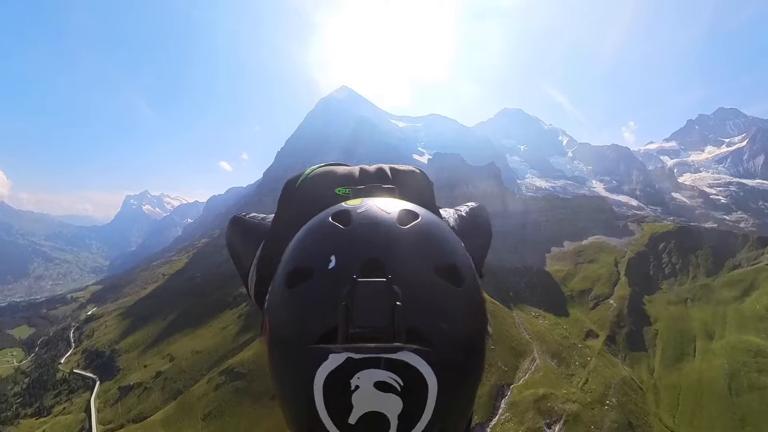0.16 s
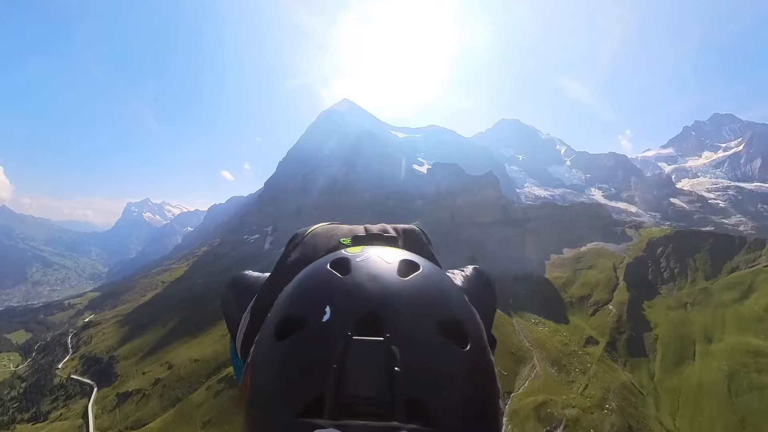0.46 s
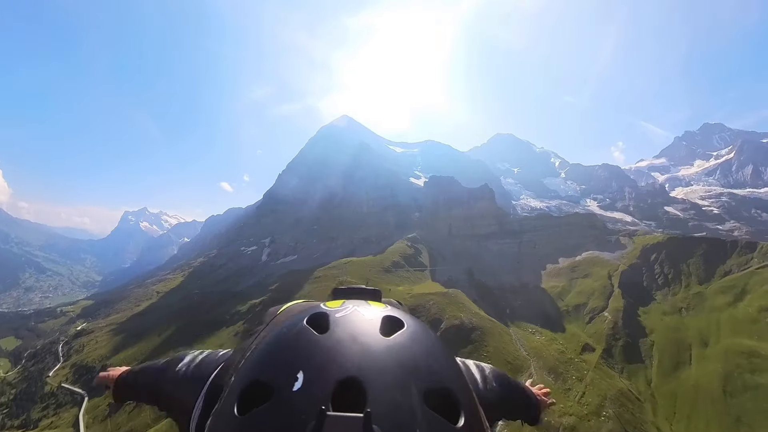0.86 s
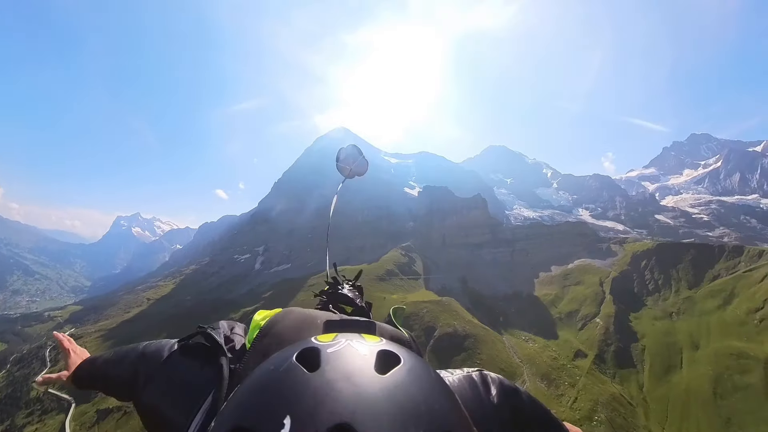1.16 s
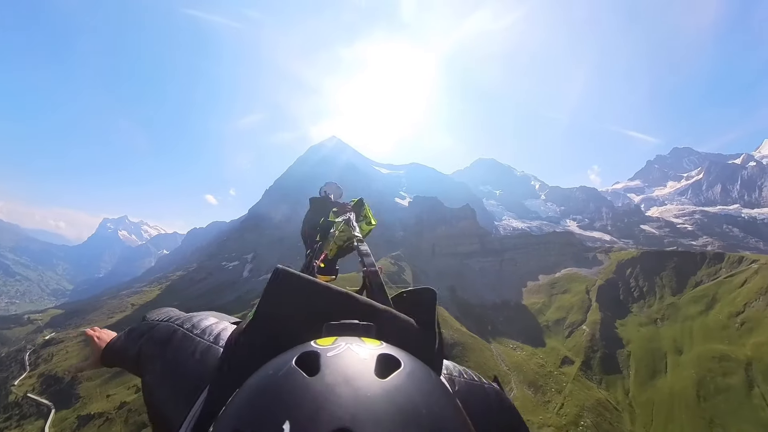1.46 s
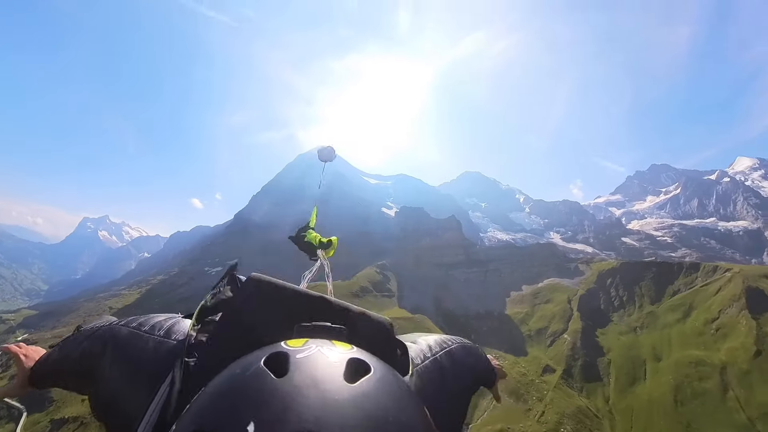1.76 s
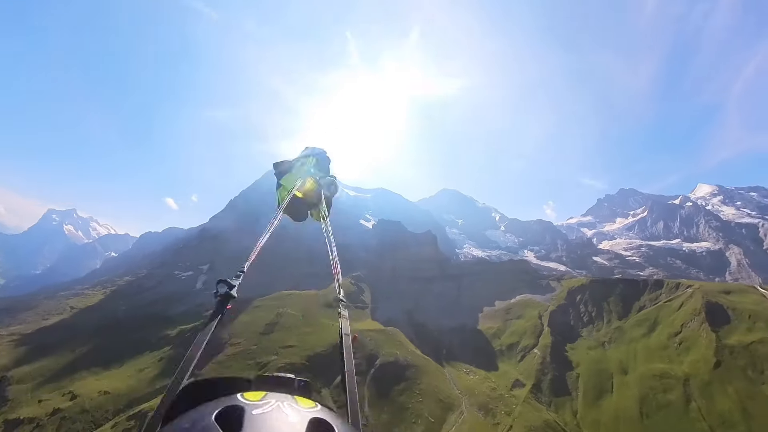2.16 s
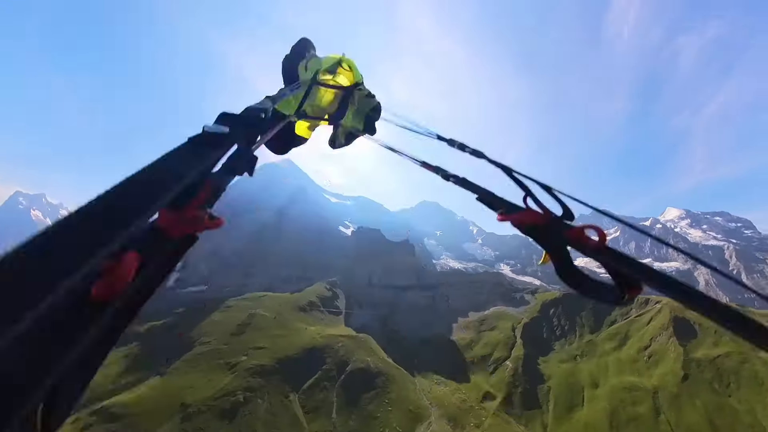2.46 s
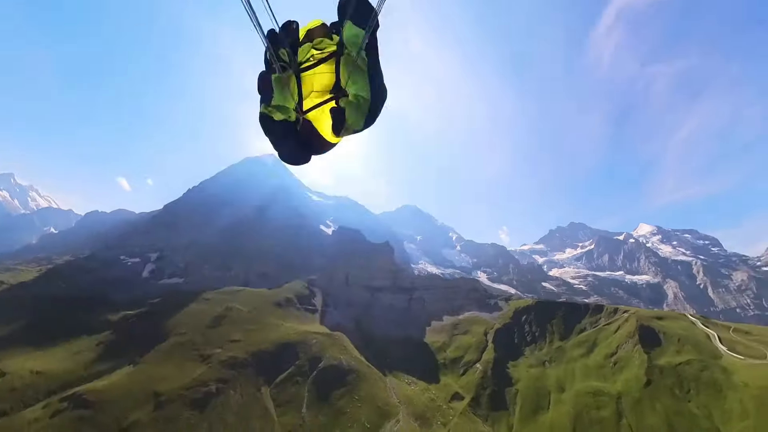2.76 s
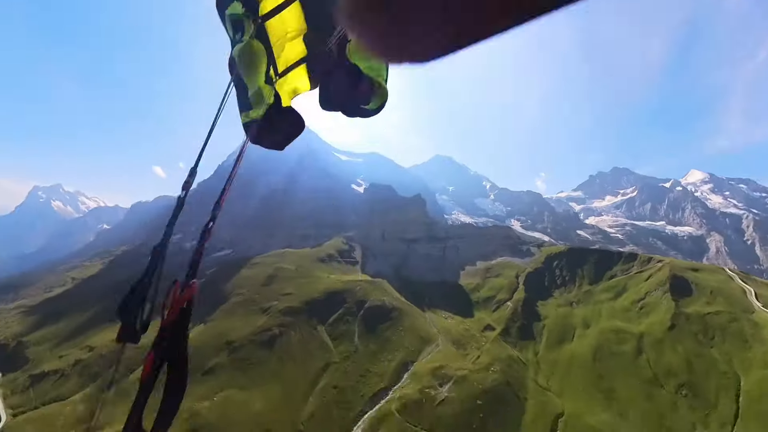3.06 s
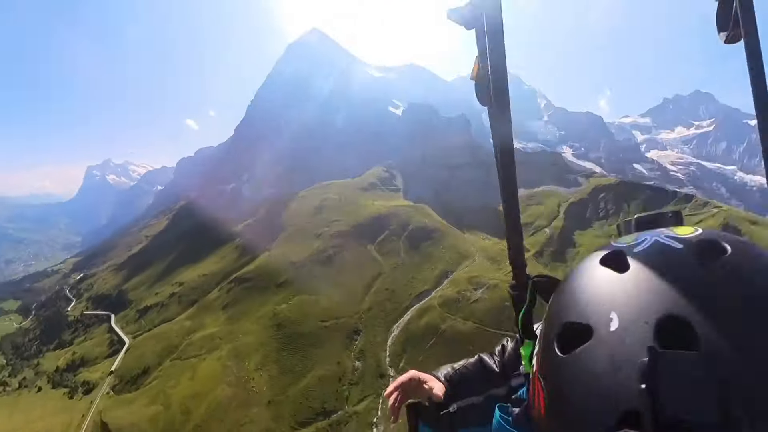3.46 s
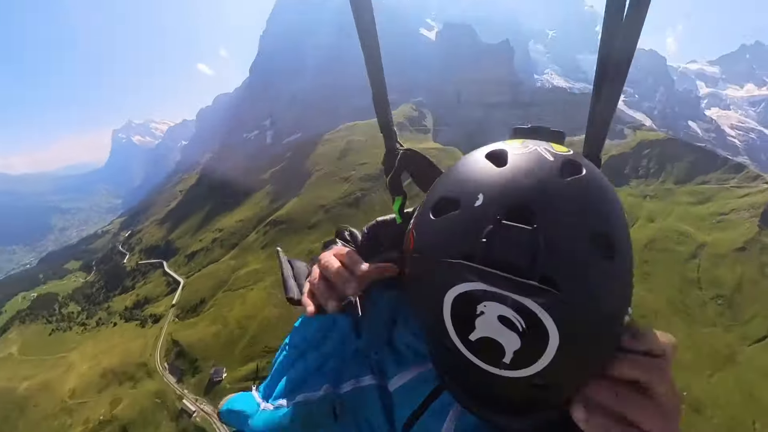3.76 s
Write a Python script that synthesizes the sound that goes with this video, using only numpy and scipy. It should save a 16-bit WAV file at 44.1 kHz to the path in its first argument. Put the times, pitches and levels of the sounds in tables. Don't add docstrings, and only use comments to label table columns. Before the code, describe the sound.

Fast wind roars and buffets a helmet microphone from 0 to 2.4 s, low and fluttering with a faint hiss. Around 2.4 s a short whistle rises; at 2.5 s a buckle knocks, parachute lines crack and tick, fabric rips and the harness jolts dully. The roar collapses by 2.8 s into separate rasping gusts, puffs and crackling straps over soft breeze, sparser after 3.4 s.

```python
import sys
import numpy as np
from scipy import signal
from scipy.fft import rfft, irfft
from scipy.io import wavfile
from scipy.ndimage import uniform_filter1d

SR = 44100
rng = np.random.default_rng(int(sys.argv[2]) if len(sys.argv) > 2 else 0)


def elevation(decibels):
    levels = np.asarray(decibels, float)
    return 10 ** (levels / 20)


def generate_wav(signal):
    frames = np.transpose(np.atleast_2d(signal))
    scaled = np.clip(frames, -1, 1) * 32767
    pcm = np.round(scaled).astype(np.int16)
    wavfile.write(sys.argv[1], SR, pcm)


N = 173313
T = np.arange(N) / SR

# (time [s], port pressure [dB], shear [dB], hiss [dB], sway [dB])
AIRSTREAM_LEVELS = [(0.0, -20.5, -39, -53, -29), (0.32, -19.5, -37, -53, -32),
                    (0.365, -21, -31.5, -54, -40), (0.405, -21, -35, -55, -40), (0.42, -22, -49, -56, -40),
                    (0.5, -20, -42, -53, -40), (0.6, -19.5, -40, -52, -39), (0.78, -18.5, -44, -50.5, -39),
                    (1.0, -21.5, -46, -50, -32), (1.05, -21, -45, -47, -29.5),
                    (1.16, -18.5, -46.5, -48, -29), (1.72, -20, -46, -50.5, -24.5),
                    (1.76, -19.5, -51, -53, -35), (1.82, -18, -50.5, -52.5, -26),
                    (2.01, -22, -44, -48.5, -28), (2.06, -18, -47, -49.5, -23.5),
                    (2.15, -21, -48.5, -51, -27.5), (2.47, -17.5, -47, -55.5, -23.5)]
# (time [s], shear [dB], hiss [dB])
BRAKING_LEVELS = [
    (2.5, -50, -58),
    (2.53, -41, -54),
    (2.555, -42, -51),
    (2.6, -49, -57),
    (2.625, -69, -72),
    (2.7, -64, -74),
    (2.745, -60, -59),
    (2.77, -76, -85),
    (2.8, -110, -110),
]
# (frequency [Hz], density [dB per Hz])
BUFFET_COLOUR = [(56, -50), (95, -8), (171, 3.5), (231, -2.5), (549, -15), (653, -21.5), (872, -20.5),
                 (1500, -34.5), (1950, -99), (3300, -120)]
# (frequency [Hz], density [dB per Hz])
SWAY_COLOUR = [(12, -39.5), (20, -33), (48, 1.5), (91, -10), (110, 0.5), (140, -13.5), (240, -120)]
# (frequency [Hz], density [dB per Hz])
SHEAR_COLOUR = [(240, -14), (400, 4), (433, 0), (884, -2.5), (1560, -12), (4040, -25), (6000, -39),
                (7800, -43.5), (13200, -120)]
# (frequency [Hz], density [dB per Hz])
HISS_COLOUR = [(1760, -7.5), (3000, 1), (4410, 5), (5270, 2), (9190, -3.5), (13600, -17.5), (15500, -14)]
# (frequency [Hz], density [dB per Hz])
BREEZE_COLOUR = [(15, -38), (25, -8), (81, -8), (150, 0), (224, -13), (617, -19.5), (1450, -33),
                 (1650, -41), (4500, -64), (9100, -102), (15400, -120)]
# (frequency [Hz], density [dB per Hz])
GUST_COLOUR = [(15, -27.5), (25, 9), (170, 7.5), (401, -17.5), (517, -17), (775, -40.5), (900, -37.5),
               (1170, -52.5), (1980, -120)]
# (frequency [Hz], density [dB per Hz])
RASP_COLOUR = [(350, 12.5), (700, -4.5), (1400, -18.5), (2800, -34), (5000, -52.5), (8000, -73)]
# (start [s], length [s], level [dB], rasp [dB])
GUST_EVENTS = [(.345, 0.065, -33, 6), (2.401, 0.079, -22.5, 9), (2.525, 0.076, -12.5, 7),
               (2.628, 0.057, -15.5, 4), (2.697, 0.065, -19.5, 4.5), (2.766, 0.036, -15, -8),
               (2.812, 0.054, -14, -7), (2.882, 0.035, -12.5, -6), (2.938, 0.043, -20, -11.5),
               (3.018, 0.042, -21.5, 6.5), (3.064, 0.069, -12, 3), (3.146, 0.066, -21.5, -1),
               (3.237, 0.064, -17, 7), (3.287, 0.061, -24.5, 2.5), (3.37, 0.046, -15.5, -3.5),
               (3.645, .04, -28, 5), (3.684, 0.032, -11, 1), (3.728, 0.065, -16, -2.3),
               (3.862, 0.032, -23.5, -4)]
# (time [s], peak [dB], thud [dB], tilt [dB per octave])
PUFF_EVENTS = [(2.12, -30, 3, -13), (2.4866, -11, -18, -7), (2.524, -27, -19, -6), (2.528, -25, -9, -7),
               (2.5415, -12, -19, -9), (2.554, -15, -6, -10), (2.62, -21, -9.5, -10.5),
               (2.633, -31, -7, -9), (2.659, -33, -16, -10), (2.671, -27, -16, -8.5),
               (2.7495, -20, -9, -15), (2.796, -35, -22, -15), (2.828, -33, -21, -14),
               (2.8895, -33, -9, -19.5), (2.9126, -27, -12, -15), (3.005, -32, -28, -18),
               (3.088, -27, 1.5, -13), (3.123, -25, -17, -15), (3.1585, -27, -22, -17),
               (3.18, -26, -19, -17), (3.196, -29, -14, -17), (3.246, -29, -14, -17),
               (3.256, -25, -17.5, -16), (3.2747, -26, -8.5, -12), (3.3116, -27, -12, -17),
               (3.4222, -17, -5, -17), (3.677, -38, -34, -9), (3.6917, -29, -6, -16),
               (3.7345, -26, -7.5, -13), (3.791, -31, -16.5, -14)]
# (frequency [Hz], level [dB], t60 [s])
BUCKLE_MODES = [
    (1120, 13.5, 0.0053),
    (2280, 9, 0.0045),
    (4000, -4, 0.005),
    (6200, -12, 0.006),
]
# (time [s], peak [dB])
TICK_EVENTS = [
    (2.5104, -60),
    (2.5324, -54),
    (2.5416, -47),
    (2.5474, -37),
    (2.5541, -28),
    (2.5574, -39),
    (2.5614, -46),
    (2.5674, -50),
    (2.5744, -47),
]
# (time [s], peak [dB], tilt [dB per octave])
CRACKLE_EVENTS = [(2.5384, -10, -12), (2.5469, -12.5, -12), (2.5634, -16, -12), (2.5957, -37, -12),
                  (2.6004, -33, -12), (2.6084, -26.5, -12), (2.642, -40, -12), (2.7014, -31, -12),
                  (2.7223, -38, -12), (2.7414, -27, -12), (2.8155, -38.5, -12), (2.9377, -39.5, -12),
                  (2.9841, -45, -12), (2.9954, -36, -12), (3.0202, -35.5, -12), (3.0299, -25, -12),
                  (3.038, -34, -12), (3.0464, -42, -12), (3.0704, -36, -12), (3.0804, -41, -12),
                  (3.0937, -28, -12), (3.1, -40, -12), (3.1077, -34, -12), (3.1147, -29, -12),
                  (3.129, -27, -12), (3.139, -41, -12), (3.1664, -42, -12), (3.1745, -27, -12),
                  (3.2064, -45, -12), (3.2186, -43.5, -12), (3.2634, -26, -12), (3.2679, -20.5, -12),
                  (3.2827, -42, -12), (3.2914, -37, -12), (3.2974, -31, -12), (3.3154, -25, -12),
                  (3.3373, -38.5, -12), (3.3707, -27.5, -12), (3.3938, -35.5, -12), (3.523, -49, -12),
                  (3.6072, -36.5, -12), (3.657, -41, -12), (3.6678, -31.5, -12), (3.702, -38, -12),
                  (3.7125, -30.5, -12), (3.7545, -39, -12), (3.7644, -37, -12), (3.7693, -36, -12),
                  (3.7768, -28, -12), (3.7839, -27.5, -12), (3.8684, -48, -12), (3.902, -40.5, -12)]


def band(x, lo_hz, hi_hz, order=2):
    sos = signal.butter(order, [lo_hz, min(hi_hz, .45 * SR)], "band", fs=SR, output="sos")
    return signal.sosfilt(sos, x)


def unit(x):
    return x / np.sqrt(np.mean(x ** 2))


def walk(rate):
    hold = int(SR / rate)
    steps = np.repeat(rng.standard_normal(N // hold + 1), hold)
    return unit(uniform_filter1d(uniform_filter1d(steps, hold), hold)[:N])


def air(colour, shared_db, own_db, rate, step=0.5019):
    hz, db = np.array(colour).T
    f = np.maximum(np.fft.rfftfreq(N, 1 / SR), 1)
    shape = elevation(np.interp(np.log(f), np.log(hz), db, left=-120, right=-120))
    shared, out = walk(rate), 0
    for centre in hz[0] * 2 ** np.arange(0, np.log2(hz[-1] / hz[0]) + 1, step):
        bell = np.cos(np.pi * np.clip(np.log2(f / centre) / step / 2, -.5, .5))
        noise = irfft(rfft(rng.standard_normal(N)) * shape * bell, N)
        out = out + noise * elevation(shared_db * shared + own_db * walk(rate / 2))
    return unit(out)


def airstream():
    s, pressure, shear, hiss, sway = np.array(AIRSTREAM_LEVELS).T
    end_s, fade_s = 2.53, 0.011
    fade = 1 / (1 + np.exp((T - end_s) / fade_s * 4))
    buffeting = air(BUFFET_COLOUR, 2.05, 1.77, 44.76) * elevation(np.interp(T, s, pressure))
    swaying = air(SWAY_COLOUR, 0.25, 0.5, 19) * elevation(np.interp(T, s, sway))

    braking_s, braking_shear, braking_hiss = np.array(BRAKING_LEVELS).T
    s = np.r_[s, braking_s]
    shear_db = np.interp(T, s, np.r_[shear, braking_shear], right=-120) + 13
    hiss_db = np.interp(T, s, np.r_[hiss, braking_hiss], right=-120) + 1
    return_db = -71.5 + 299.5 * np.minimum(T - 3.9, 0)

    def treble():
        shearing = air(SHEAR_COLOUR, 1.77, 1.8, 70) * elevation(shear_db)
        hissing = air(HISS_COLOUR, 0.43, 2.45, 69.8, step=0.2564) * elevation(hiss_db)
        returning = unit(band(rng.standard_normal(N), 3500, 15500, order=1)) * elevation(return_db)
        return shearing + hissing + returning

    return (buffeting + swaying) * fade + treble(), treble()


def breeze():
    lull_s, lull_width_s, lull_db = 3.835, 0.049, -5
    lull = lull_db * np.exp(-((T - lull_s) / lull_width_s) ** 2)
    gain = elevation(-34 + 2.2 * walk(6.8) + lull)
    return [air(BREEZE_COLOUR, 1.2, 1.2, 40) * gain for _ in range(2)]


def gusts():
    attack_s, release_s = .006, 0.0078
    gain, rasp_db, even = np.zeros(N), np.zeros(N), np.ones(N)
    push = air(GUST_COLOUR, 1.0, 0.67, 60)
    for start, length, db, rasp in GUST_EVENTS:
        rise = np.clip((T - start) / attack_s, 0, 1)
        fall = np.exp(-np.maximum(T - start - length, 0) / release_s)
        gain = np.maximum(gain, elevation(db) * rise * fall)
        rasp_db[T > start] = rasp
        even[T > start] = 1 / np.std(push[(T > start) & (T < start + length)])
    gain = uniform_filter1d(uniform_filter1d(gain, size=60), size=60)

    eddies_per_s, eddy_s = 240, 0.0011
    eddies = (rng.random(N) < eddies_per_s / SR) * elevation(6.4 * rng.random(N))
    pole = np.exp(-1 / (eddy_s * SR))
    swell = unit(signal.lfilter([1], np.convolve([1, -pole], [1, -pole]), eddies))
    gate = (swell + 0.032) * gain * elevation(-20 + rasp_db)
    rasp_mid, rasp_side = [air(RASP_COLOUR, 1.8, 1.3, 60) * gate for _ in range(2)]
    return push * uniform_filter1d(even, size=200) * gain + rasp_mid, rasp_side


def puffs():
    puff_s, thud_hz, thud_s = 0.00064, 242, 0.0013
    n = np.arange(2048) / SR - .01
    late = np.maximum(n, 0)
    f = np.maximum(np.fft.rfftfreq(len(n), 1 / SR), 900)
    out = np.zeros(N + len(n))
    chance = rng.standard_normal((len(PUFF_EVENTS), len(n)))
    thud = np.sin(2 * np.pi * thud_hz * late) * late / thud_s * np.exp(1 - late / thud_s)
    for (s, db, thud_db, tilt_db), noise in zip(PUFF_EVENTS, chance):
        burst = noise * late / puff_s * np.exp(-late / puff_s)
        tilted = irfft(rfft(burst) * elevation(tilt_db * np.log2(f / 1000)), len(n))
        body = band(tilted, 250, 14000)
        peak = abs(band(body, 550, 5000)).max()
        k = int((s + n[0]) * SR)
        out[k:k + len(n)] += elevation(db) * body / peak + elevation(thud_db - 3.5) * thud
    return out[:N]


def whistle():
    start_s, length_s, start_hz, rise_hz_s, width_hz = 2.385, .1, 600, 4500, 330
    u = np.clip((T - start_s) / length_s, 0, 1)
    low_pass = signal.butter(2, width_hz / 2, fs=SR, output="sos")
    wobble = signal.sosfilt(low_pass, rng.standard_normal((2, N)))
    phase = 2 * np.pi * np.cumsum(start_hz + rise_hz_s * length_s * u) / SR
    tone = unit(wobble[0] * np.cos(phase) + wobble[1] * np.sin(phase))
    return tone * elevation(-27) * np.sin(np.pi * u ** 2.0)


def buckle():
    t = np.maximum(T - 2.5102, 0)
    modes = [elevation(db) * np.sin(2 * np.pi * hz * t) * 1000 ** (-t / t60) for hz, db, t60 in BUCKLE_MODES]
    return band(elevation(-10) * sum(modes) * np.minimum(t / 0.0013, 1), 500, 7000)


def bursts(times, dbs, tilts_db, decay_s, knee_hz, lo_hz, hi_hz, top_hz):
    n = np.arange(1024) / SR - .005
    late = np.maximum(n, 0) / decay_s
    f = np.maximum(np.fft.rfftfreq(len(n), 1 / SR), knee_hz)
    out = np.zeros((2, N + len(n)))
    chance = rng.standard_normal((len(times), 2, len(n)))
    for s, db, tilt_db, noise in zip(times, dbs, tilts_db, chance):
        tilted = irfft(rfft(noise) * elevation(tilt_db * np.log2(f / 1000)), len(n))
        x = tilted * late * np.exp(-late)
        peak = abs(band(x, lo_hz, hi_hz)).max(axis=1, keepdims=True)
        k = int((s + n[0]) * SR)
        out[:, k:k + len(n)] += elevation(db) * band(x, lo_hz / 3, top_hz, order=3) / peak
    return out[:, :N]


def ticks():
    s, db = np.array(TICK_EVENTS).T
    return band(bursts(s, db - 3, 0 * s, 0.00065, 900, 10500, 15000, 16000), 11000, 14500)


def rip():
    start_s, length_s, clicks_per_s = 2.53, .055, 1500
    u = np.clip((T - start_s) / length_s, 0, 1)
    clicks = (rng.random(N) < clicks_per_s / SR) * elevation(2.5 * rng.exponential(size=N))
    grain = signal.lfilter([1], [1, -.97], clicks) * rng.standard_normal(N)
    return unit(band(grain, 8000, 14000)) * elevation(-59) * np.sin(np.pi * u)


def crackles():
    s, db, tilt_db = np.array(CRACKLE_EVENTS).T
    return bursts(s, db - 2, tilt_db, .0012, 500, 900, 4400, 4600)


def jolt():
    start_s, start_hz, sag_hz_s, rise_s = 2.541, 303.6, 2340, 0.0084
    t = np.clip(T - start_s, 0, .08)
    swell = t / rise_s * np.exp(1 - t / rise_s) * (t < .08)
    return elevation(-8) * swell * np.sin(2 * np.pi * (start_hz * t - sag_hz_s * t ** 2 / 2))


def scene():
    tear = rip()
    wide = [airstream(), breeze(), gusts(), ticks(), (tear, tear), crackles()]
    mid = sum(part[0] for part in wide) + puffs() + whistle() + buckle() + jolt()
    side = elevation(-5.5) * band(sum(part[1] for part in wide), 3360, 14000, order=8)
    return np.array([mid + side, mid - side])


def roll_off(x):
    return signal.sosfilt(signal.butter(12, 16060, fs=SR, output="sos"), x)


def record(dry):
    low_cut = signal.butter(2, 42, "high", fs=SR, output="sos")
    top_cut = signal.ellip(8, .3, 60, 15300, fs=SR, output="sos")
    ceiling = .85
    rounded = ceiling * np.tanh(signal.sosfilt(low_cut, dry) / ceiling)
    mix = signal.sosfilt(top_cut, rounded)
    return roll_off(mix)


dry = scene()
out = record(dry)
generate_wav(out)
```